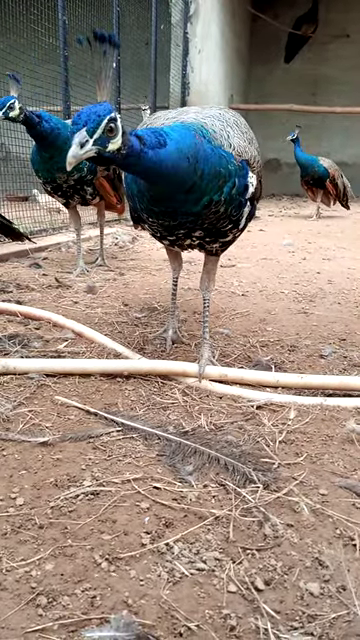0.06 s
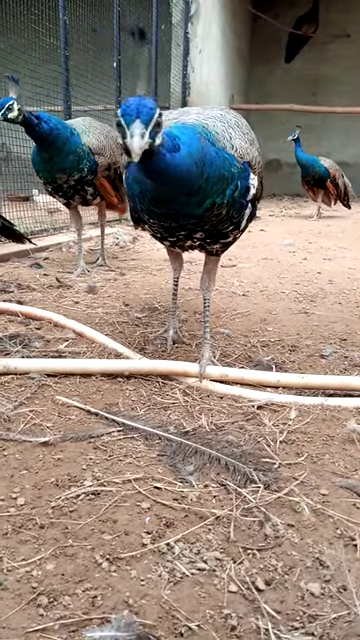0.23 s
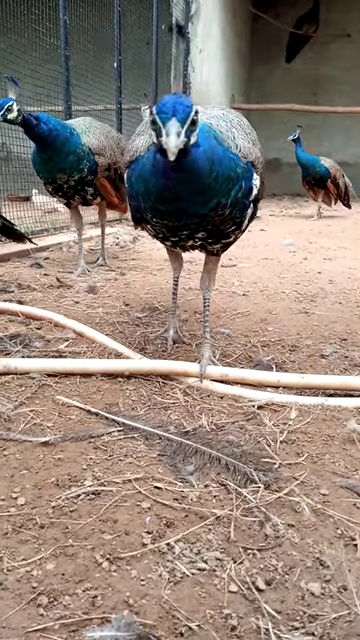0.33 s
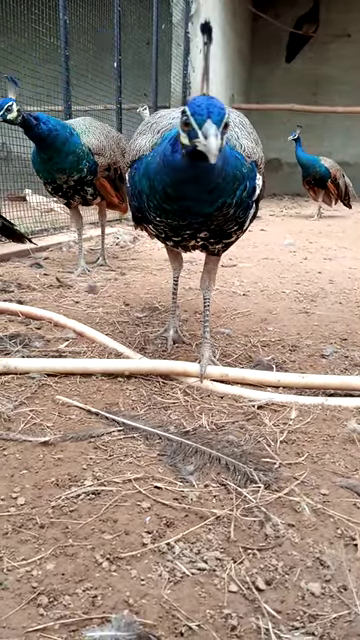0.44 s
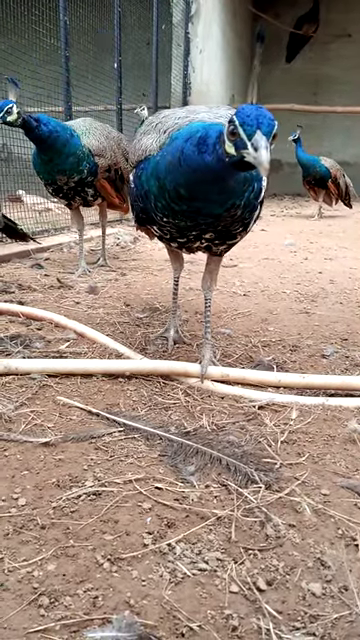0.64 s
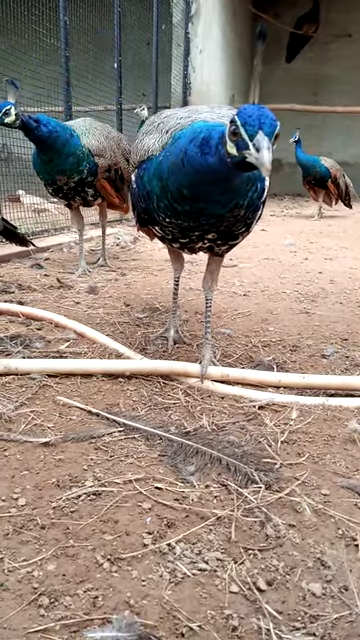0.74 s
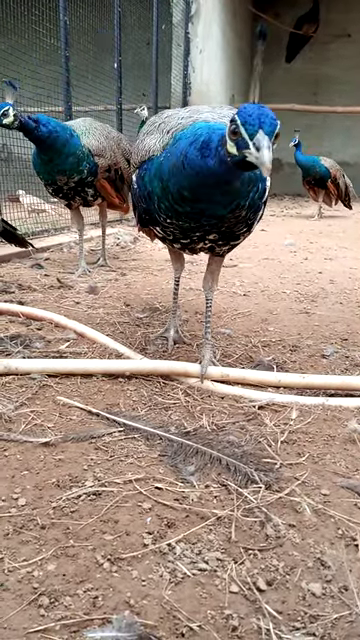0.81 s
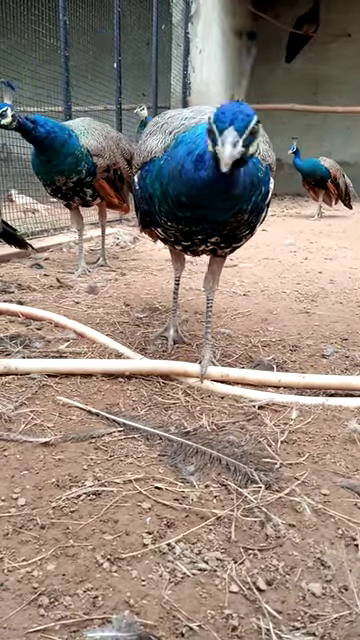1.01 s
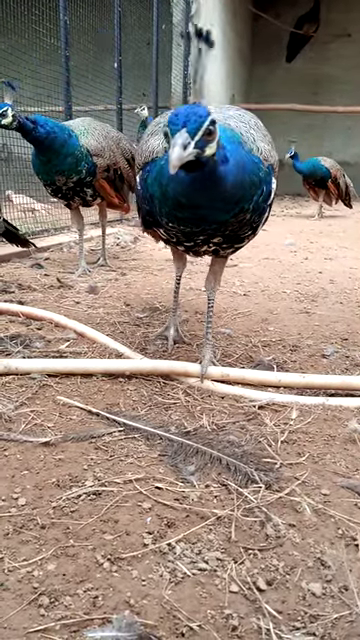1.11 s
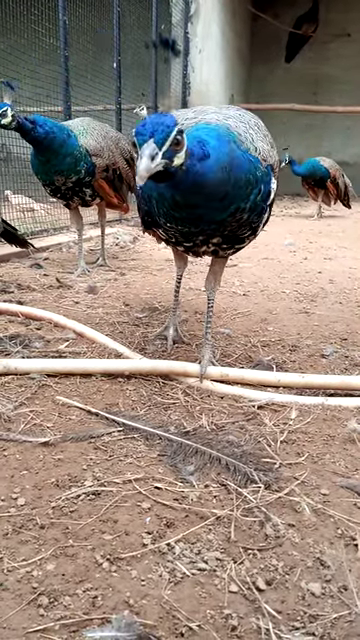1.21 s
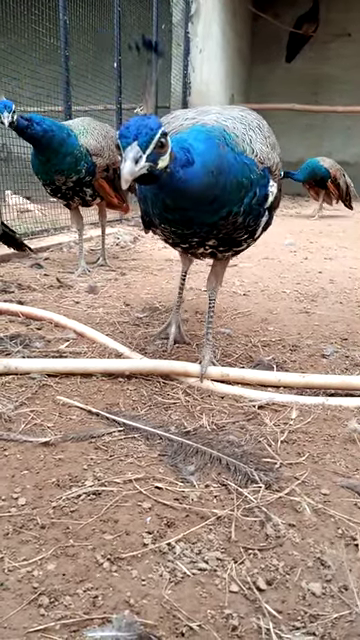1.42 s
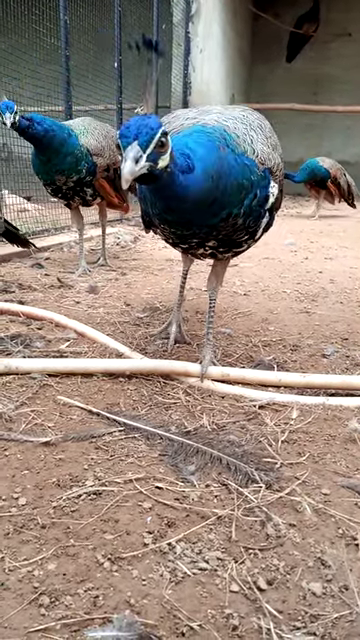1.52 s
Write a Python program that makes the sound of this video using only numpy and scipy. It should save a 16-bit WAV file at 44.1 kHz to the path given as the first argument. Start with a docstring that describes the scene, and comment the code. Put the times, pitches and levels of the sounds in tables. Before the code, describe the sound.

A peafowl gives one loud, harsh call close by in an outdoor pen. At about 0.2 seconds it scoops from a rasp into a fluttering scream, then breaks lower around 0.35 and sags away by 0.5, with a soft, low bump beneath. A light echo trails off. Faint hiss and rumble run throughout, with distant small birds chirping at the start and around 1.3 seconds.

```python
"""An outdoor pen, with a peafowl close to the microphone. It gives one harsh call: pulses of the
syrinx ring its throat and beak, scoop up from a rasp to a fluttering scream, break down an octave
and sag away. The pen, the yard and a far wall throw the call back. Small birds chirp in the
distance over faint hiss and a low rumble, and there is one soft bump."""
import sys
import numpy as np
from scipy import signal
from scipy.fft import rfft, irfft
from scipy.io import wavfile
from scipy.ndimage import uniform_filter1d

SR = 44100
rng = np.random.default_rng(int(sys.argv[2]) if len(sys.argv) > 2 else 0)


def wav_record(signal):
    """Record a signal, one row per channel, as 16-bit PCM in the file named by sys.argv[1]."""
    frames = np.transpose(np.atleast_2d(signal))
    bounded = np.clip(frames, -1, 1)
    # unit amplitude maps onto the largest positive 16-bit level
    quanta = np.round(bounded * 32767).astype(np.int16)
    wavfile.write(sys.argv[1], SR, quanta)


N = 68355
T = np.arange(N) / SR
BINS = np.fft.rfftfreq(N, 1 / SR)


def amp(db):
    """Decibels to gain."""
    return 10 ** (np.asarray(db) / 20)


def unit_rms(x):
    """Scales to an rms of 1."""
    return x / np.sqrt(np.mean(x ** 2) + 1e-20)


def read(table, hz):
    """Reads a table on a log-frequency axis."""
    f, value = np.transpose(table)
    return np.interp(np.log(hz + 1), np.log(np.sort(f) + 1), value)


def coloured(x, spectrum):
    """Filters a sound by a table of level against frequency."""
    return irfft(rfft(x) * amp(read(spectrum, BINS)), N)


def noise(spectrum, envelope=1):
    """Noise of rms 1, shaped in time and then in frequency."""
    return unit_rms(coloured(envelope * rng.standard_normal(N), spectrum))


def wander(hz):
    """Random motion of rms 1, slower than about hz."""
    return unit_rms(irfft(rfft(rng.standard_normal(N)) * np.exp(-(BINS / hz) ** 2), N))


def echo(x, t60):
    """Diffuse echoes that fall 60 dB in t60 seconds: one time, or a table by frequency."""
    hz, t, spectra = signal.stft(rng.standard_normal(SR), SR, nperseg=256)
    t60 = read(t60, hz)[:, None] if np.ndim(t60) else t60
    envelope = np.exp(-np.log(1000) * t / t60) * np.minimum(t / 0.0075, 1)
    tail = signal.istft(spectra * envelope, SR, nperseg=256)[1]
    return signal.fftconvolve(x, tail / np.linalg.norm(tail))[:N]


def delayed(x, seconds):
    """The same sound, arriving later."""
    hz = np.fft.rfftfreq(2 * N, 1 / SR)
    return irfft(rfft(x, 2 * N) * np.exp(-2j * np.pi * hz * seconds))[:N]


# Hiss and rumble around the pen (frequency [Hz], relative density [dB])
AIR_SPECTRUM = [(250, -2.5), (600, -8), (1100, -16), (1600, -4), (1950, -8.5), (2400, 0), (2850, -7),
                (3600, 0.5), (5600, -4), (6400, -12.5), (7400, -37.5), (15500, -33.5)]
RUMBLE_SPECTRUM = [(20, -31.5), (40, -20.5), (60, 1.5), (90, 3), (145, 3.5), (200, -8.5), (280, -21),
                   (500, -36)]
# Their course at the microphone (time [s], level [dB])
AIR_LEVELS = [(0, -62.5), (.15, -67), (0.599, -62.5), (0.849, -72), (0.969, -75), (1.07, -72), (1.1, -64),
              (1.38, -65), (1.481, -70)]
RUMBLE_LEVELS = [(0, -65), (.2, -66.5), (.27, -75), (.42, -79), (0.501, -65.5), (0.589, -70), (0.751, -65),
                 (1.14, -71.5), (1.3, -72), (1.55, -74)]


def outdoor_air(patch_db=3.5):
    """Faint hiss and low rumble, coming and going in random patches of time and frequency."""
    hiss = amp(np.interp(T, *np.transpose(AIR_LEVELS))) * noise(AIR_SPECTRUM)
    rumble = amp(np.interp(T, *np.transpose(RUMBLE_LEVELS))) * noise(RUMBLE_SPECTRUM)
    spectra = signal.stft(hiss + rumble, SR, nperseg=512)[2]
    patches = uniform_filter1d(rng.standard_normal(spectra.shape), size=6, axis=0)
    patches = unit_rms(uniform_filter1d(patches, size=14, axis=1))
    return signal.istft(spectra * amp(patch_db * patches), SR, nperseg=512)[1][:N]


# Small birds far from the microphone
# (start [s], length [s], pitch [Hz], glide [Hz], bandwidth [Hz], level [dB])
DISTANT_CHIRPS = [(.005, 0.04, 4600, -3.5, 900, -58), (0.012, 0.093, 6240, -250, 500, -62.5),
                  (1.092, 0.316, 1537, 71, 200, -78), (.755, 0.088, 5360, 3.5, 799, -67),
                  (1.238, .1, 4872, -300, 547, -59.5), (1.302, .11, 4510, 156.5, 502, -63)]


def small_birds(echo_db=-3.5):
    """High gliding chirps, blurred by distance."""
    chirps = np.zeros(N)
    for start, length, hz, glide, width, db in DISTANT_CHIRPS:
        progress = np.clip((T - start) / length, 0, 1)
        whistle = np.cos(2 * np.pi * np.cumsum(hz + glide * progress) / SR) * wander(width / 2)
        chirps += amp(db) * np.sin(np.pi * progress) * unit_rms(whistle)
    return chirps + amp(echo_db) * echo(chirps, t60=0.3)


# The call at close range: croak and scream, then the wail after the break
# (time [s], pitch [Hz], level [dB], brightness [dB/octave], roughness [0-1])
SCREAM_PATH = [(.1968, 372, -59, -1, .28), (.2034, 402, -27, -0.25, 0.4), (.2142, 521.1, -30, -0.04, 0.4),
               (.2212, 755, -21.5, 0.03, 0.3), (.2258, 881, -24, -0.8, .22),
               (.2287, 1212, -16.5, -2.5, 0.2), (.2338, 1135, -15, -2.5, 0.05),
               (.2455, 1192, -12.5, 0.5, 0), (.286, 1228, -13, 1.5, 0.01), (.3212, 1267, -13, 3, 0.04),
               (.3345, 1233, -14, .5, 0), (.3435, 1169, -11.5, 1, 0), (.3508, 1088, -15.5, 0.5, 0),
               (.3562, 1045, -22, -1.5, 0.2)]
WAIL_PATH = [(.3568, 807, -23, 3.5, .08), (.3606, 794.8, -14, -1, .05), (.3712, 757, -15, 1, 0.05),
             (.3755, 734.3, -19, 1, 0.054), (.3902, 682.6, -22, 1.4, 0.065),
             (.4032, 658.5, -20.6, 1.66, .07), (.4362, 618, -22, 1.1, .06),
             (.4462, 589.7, -21, -0.6, 0.057), (.4605, 555.2, -23, -2, 0.065),
             (.4802, 514.4, -30.5, -0.5, 0.086), (.4985, 478.2, -30, -3.5, .07),
             (.5082, 449.8, -35, -7, 0.073), (.5168, 434, -43, -7, 0.14)]


def call_gesture():
    """The course of the voice, with 0-1 weights for croaking, wailing and sounding at all."""
    times, *columns = np.transpose(SCREAM_PATH + WAIL_PATH)
    curves = [uniform_filter1d(np.interp(T, np.sort(times), c), size=56) for c in columns]
    croaking = np.interp(T, [SCREAM_PATH[3][0], SCREAM_PATH[5][0]], [1, 0])
    break_times = sorted([SCREAM_PATH[-1][0], WAIL_PATH[0][0]])
    wailing = uniform_filter1d(np.interp(T, break_times, [0, 1]), size=100)
    sounding = uniform_filter1d(1. * ((T > times[0]) & (T < times[-1])), size=64)
    return curves, croaking, wailing, sounding


# Throat and beak in the croak (beak half shut), scream and wail (frequency [Hz], relative gain [dB])
CROAK_SHAPE = [(300, -27.5), (1050, -14), (1500, -18), (2030, 0), (2520, -10), (2900, -9), (4100, -10),
               (4850, -33), (5900, -26), (6600, -56)]
SCREAM_SHAPE = [(150, -56), (400, -28.5), (650, -25), (1150, -24), (1500, -25), (1950, -6.5), (2350, 0.5),
                (2550, -2), (2800, -5.5), (3080, -7), (3400, -26), (3560, -12.5), (3800, -10.5),
                (4450, -15), (5200, -28), (5600, -33.5), (6200, -29.5), (7300, -61.5), (8600, -57),
                (9400, -69), (10800, -53), (13500, -67.5), (15300, -56.5)]
WAIL_SHAPE = [(400, -34.5), (630, -17), (760, -27), (1050, -15), (1600, -19.5), (1860, 0), (2080, -2),
              (2370, 4), (2470, -14.5), (2560, -8.5), (2720, -13), (2950, -19.5), (3200, -21.5),
              (3420, -32.5), (3650, -18), (4650, -23), (5200, -35.5), (6100, -32), (7300, -54), (9400, -62),
              (11500, -49.5), (15000, -70.5)]


def throat(hz, pitch, croaking, wailing, beak_hz=4450, beak_width_hz=320, beak_db=10):
    """Throat gain: resonances rise with the croak; the wail's upper one sinks as the beak closes."""
    opening = (pitch / SCREAM_PATH[1][1]) ** 0.19
    resonance_hz = beak_hz * (pitch / WAIL_PATH[0][1]) ** 0.31
    croak_db = read(CROAK_SHAPE, hz / opening)
    scream_db = read(SCREAM_SHAPE, hz)
    wail_db = read(WAIL_SHAPE, hz) + beak_db * np.exp(-((hz - resonance_hz) / beak_width_hz) ** 2)
    return amp(croaking * croak_db + (1 - croaking - wailing) * scream_db + wailing * wail_db)


def throat_phase():
    """The phase shift that goes with the scream's resonances, in radians per bin."""
    log_gain = np.log(amp(read(SCREAM_SHAPE, abs(np.fft.fftfreq(N, 1 / SR)))))
    return -signal.hilbert(log_gain).imag[:len(BINS)]


def syrinx(cycles, hz, pitch, brightness, croaking, wailing, shimmer=0.071):
    """Pulses ring the throat as 23 harmonics; hz includes the flutters, pitch does not."""
    throat_shift = throat_phase()
    voice, power = np.zeros(N), np.zeros(N)
    for k in range(1, 24):
        tilt = amp(brightness * np.log2(np.minimum(k * pitch, 6000) / pitch))
        waver = 0.3 * np.minimum(k * hz / 10000, 1) ** 2 * wander(hz=68)  # high partials waver most
        phase = 2 * np.pi * k * cycles + np.interp(k * hz, BINS, throat_shift) + waver
        voice += (k * hz < SR / 2) * tilt * throat(k * hz, pitch, croaking, wailing) * np.cos(phase)
        power += (tilt * throat(k * pitch, pitch, croaking, wailing)) ** 2 / 2
    voice *= 1 + shimmer * wander(hz=343)
    return voice / np.sqrt(uniform_filter1d(power, size=100))


# Rasp of the syrinx after the croak (frequency [Hz], relative density [dB])
RASP_SPECTRUM = [(300, -71), (800, -33.5), (1200, -20.5), (2200, -3), (3100, -7.5), (4100, -0.5),
                 (5300, -16), (6300, -15.5), (7400, -41), (10000, -54)]


def rasp(puffs, croaking):
    """Each cycle lets out a puff of noise, coloured at first by the half-shut beak."""
    return croaking * noise(CROAK_SHAPE, puffs) + (1 - croaking) * noise(RASP_SPECTRUM, puffs)


# Air in the beak, heard close up (frequency [Hz], relative density [dB])
SIZZLE_SPECTRUM = [(1000, -63), (2000, -8.5), (2850, 6), (4500, 4.5), (5500, -2.5), (6300, 0.5),
                   (7400, -21), (8600, -21), (9400, -32), (11500, -21), (13800, -30), (15300, -21)]


def sizzle(puffs, croaking, level_db=-25, crack_s=0.25, crack_width_s=0.00087):
    """Air sizzles in the open beak, with a bright burst at the crack into the high register."""
    crack_db = 10.5 * np.exp(-((T - crack_s) / crack_width_s) ** 2)
    return (1 - croaking) * amp(level_db + crack_db) * noise(SIZZLE_SPECTRUM, puffs)


# Flutters in the scream (time [s], pitch rise [Hz], level change [dB])
SCREAM_FLUTTERS = [(0.2404, 100.6, -1.5), (0.251, 332.3, -4.5), (0.2654, 363, -3), (0.28, 388.7, -4),
                   (0.293, 359.5, -2.5), (0.3046, 242.6, -2.5), (0.3158, 98.9, -3)]


def flutter(hz, level_db, width_s=0.0025):
    """The pitch flicks up and the voice thins for an instant."""
    for at, rise, change_db in SCREAM_FLUTTERS:
        flick = np.exp(-((T - at) / width_s) ** 2)
        hz = hz + rise * flick
        level_db = level_db + change_db * flick
    return hz, level_db


def peafowl(jitter=0.0048, beak_cut_hz=450):
    """Voice and breath leave the small beak, which radiates little bass, close to the microphone."""
    (pitch, level_db, brightness, roughness), croaking, wailing, sounding = call_gesture()
    hz, level_db = flutter(pitch, level_db)
    cycles = np.cumsum(hz * (1 + jitter * wander(hz=343))) / SR
    voice = syrinx(cycles, hz, pitch, brightness, croaking, wailing)
    puffs = 0.21 + np.exp(-(cycles % 1) / 0.36)
    breath = roughness * rasp(puffs, croaking) + sizzle(puffs, croaking)
    call = sounding * amp(level_db) * (voice + breath)
    return signal.sosfilt(signal.butter(4, beak_cut_hz, "high", fs=SR, output="sos"), call)


# Ground and fence near the microphone (delay [s], gain [dB])
NEAR_REFLECTIONS = [(.0031, -29.5), (.0074, -20.5), (.021, -23)]
# Hollow ring of the pen (frequency [Hz], gain [dB])
PEN_RING = [(300, -31), (520, -9.5), (800, -13), (1500, -14.5), (2400, -24), (4000, -24)]
# Echoes from the yard beyond (frequency [Hz], time to fall 60 dB [s])
YARD_DECAY = [(1200, 0.46), (2000, .65), (2400, 1.5), (3000, 0.77), (5000, 1.1), (12000, .4)]


def pen(call, yard_db=-41.5, wall_db=-53.5, wall_delay_s=0.38):
    """The call reaches the microphone directly, then from ground, fence, pen, yard and far wall."""
    near = sum(amp(db) * delayed(call, seconds) for seconds, db in NEAR_REFLECTIONS)
    ring = coloured(echo(call, t60=0.3), PEN_RING)
    yard = amp(yard_db) * echo(call, YARD_DECAY)
    wall = amp(wall_db) * delayed(echo(call, t60=0.32), wall_delay_s)
    return call + near + ring + yard + wall


def bump(at_s=0.3925, hz=160, width_s=0.0038, level_db=-45):
    """One soft, low knock under the wail."""
    t = T - at_s
    return amp(level_db) * np.exp(-(t / width_s) ** 2) * np.sin(2 * np.pi * hz * t)


def scene():
    """One microphone at the pen: the peafowl close by, small birds far off, open air all round."""
    return (pen(peafowl()) + small_birds() + outdoor_air() + bump())[None]


def record(dry, edge_hz=15750):
    """The band limit of the recorder."""
    lowpass = signal.firwin(511, edge_hz, window=("kaiser", 9), fs=SR)
    return signal.oaconvolve(dry, lowpass[None], "same")


dry = scene()
out = record(dry)
wav_record(out)
```